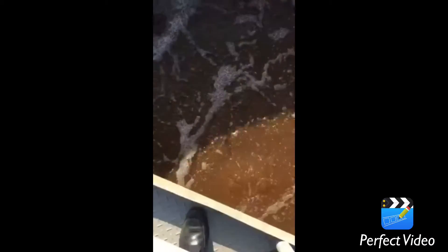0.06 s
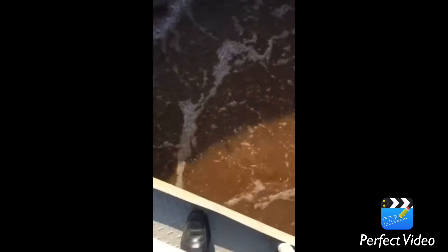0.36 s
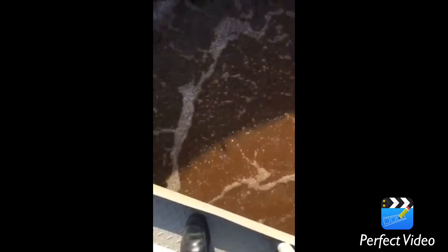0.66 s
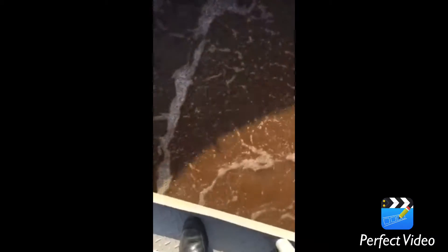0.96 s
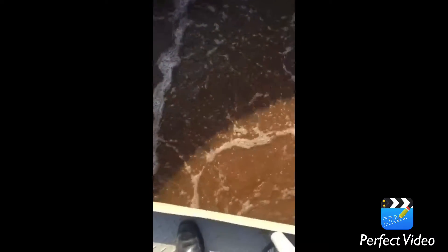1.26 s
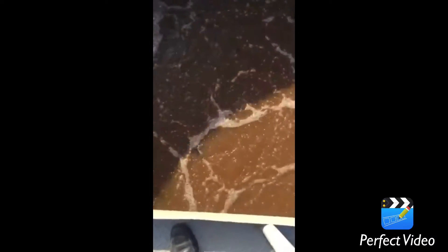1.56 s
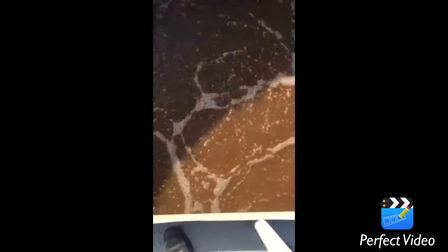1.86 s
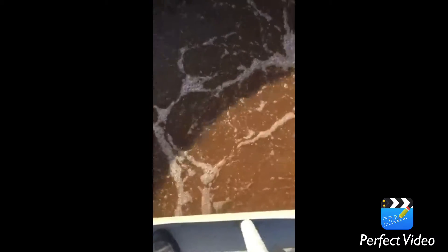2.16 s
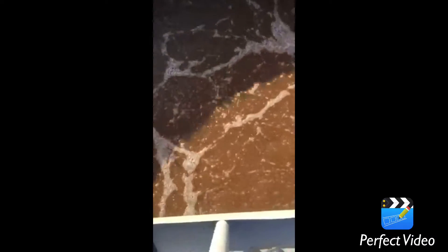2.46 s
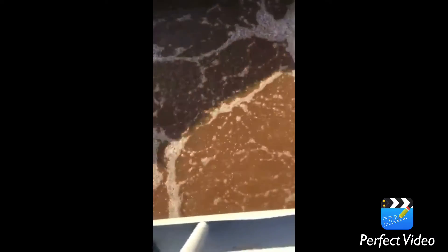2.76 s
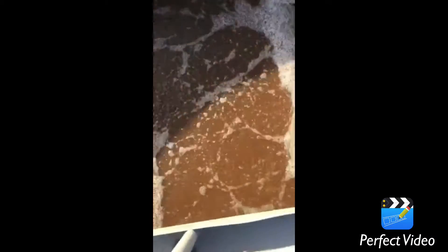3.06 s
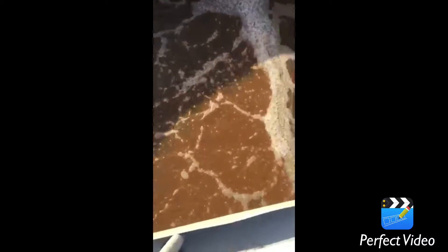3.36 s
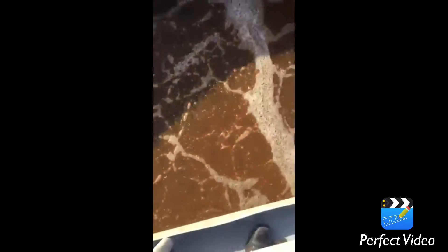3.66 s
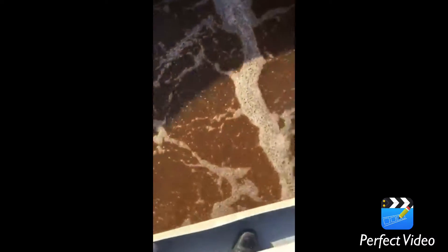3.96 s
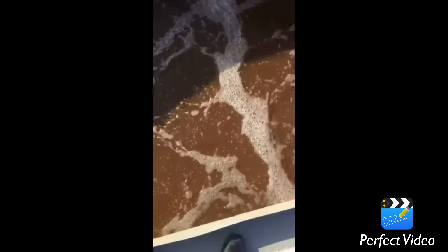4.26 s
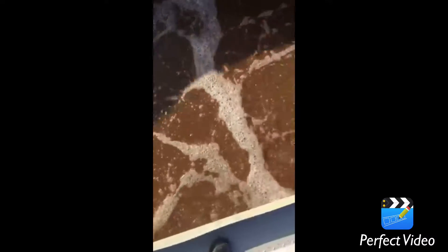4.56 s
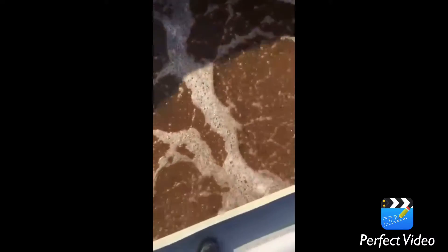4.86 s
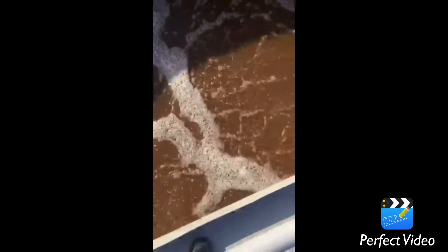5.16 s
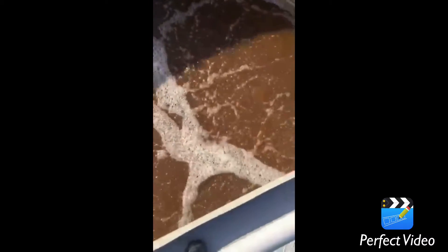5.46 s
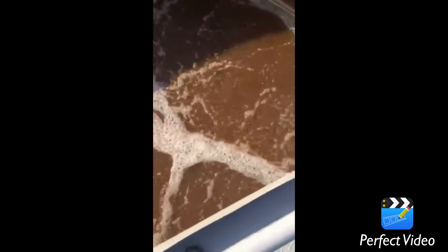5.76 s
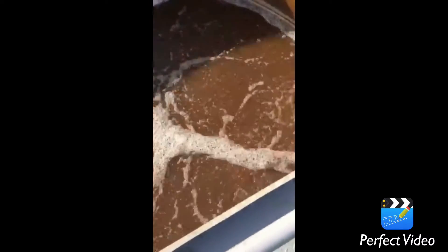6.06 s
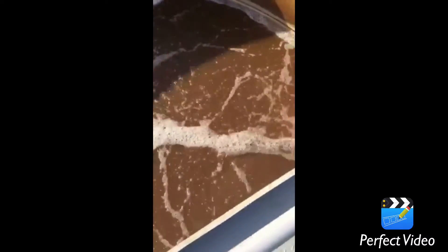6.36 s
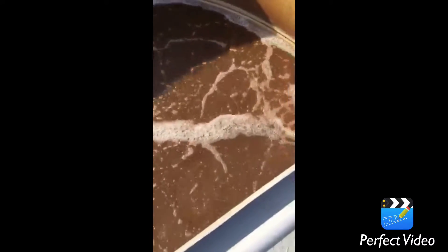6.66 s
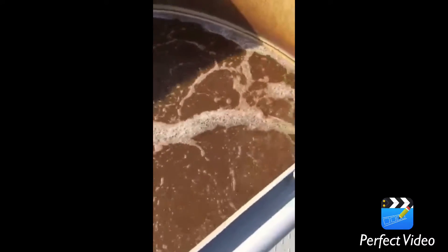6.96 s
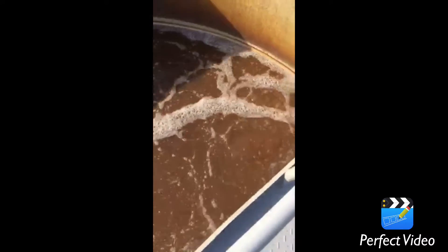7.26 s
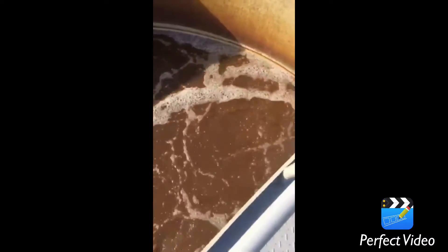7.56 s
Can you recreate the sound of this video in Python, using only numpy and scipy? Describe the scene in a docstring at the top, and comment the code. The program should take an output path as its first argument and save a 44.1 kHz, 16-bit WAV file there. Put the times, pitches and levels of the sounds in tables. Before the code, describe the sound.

Outdoors at an aeration tank, foamy water churns and bubbles continuously over the drone and thin whine of blower machinery. Low wind rumble runs underneath, and after about a second gusts start knocking on the microphone in clusters of hollow thumps. These thin out past the middle, as the machine tones swell and several big bubbles glug up through the water.

```python
"""An aeration tank heard from its walkway: rising air keeps the water gurgling, splashing and fizzing.
Behind it a blower hums and whines, its tones swelling as the listener turns through their standing
waves; its supply pipe roars and a second machine drones. Wind rumbles on the microphone and throws
dull puffs and hollow thumps at it. Late on, a run of large bubbles glugs to the surface."""
import sys
import numpy as np
from scipy import signal
from scipy.fft import rfft, irfft, next_fast_len
from scipy.io import wavfile
from scipy.ndimage import uniform_filter1d, map_coordinates

SR = 44100
rng = np.random.default_rng(int(sys.argv[2]) if len(sys.argv) > 2 else 0)


def digitize_waveform(pressure):
    """Quantize a signal to 16-bit integers and store it at the path in sys.argv[1].

    Rows of a 2-D input are taken as channels; values are limited to [-1, 1].
    """
    field = np.atleast_2d(pressure).T
    bounded = np.clip(field, -1, 1)
    quanta = np.round(bounded * 32767).astype(np.int16)
    wavfile.write(sys.argv[1], SR, quanta)


N = 340011
SHAFT_HZ = 48.702

# faders for the water, before trim: t/s, gurgle/dB, splash/dB, fizz/dB
WATER_LEVELS = [(0.0, -36.5, -42.5, -51), (0.62, -37, -43.5, -52.5), (1.44, -38.5, -44.5, -53.5),
                (1.8, -42, -48, -54), (1.97, -36.5, -45.5, -53.5), (2.38, -34, -43.5, -51.5),
                (2.86, -36.5, -43, -50), (3.05, -33.5, -43.5, -50), (3.39, -36, -43.5, -52),
                (3.78, -37, -44, -52.5), (4.53, -35, -44, -50.5), (4.81, -34, -42, -47),
                (5.28, -33.5, -43, -50), (5.54, -32, -42, -50), (7.28, -36, -41.5, -49),
                (7.71, -33, -40.5, -47)]
# EQ of the deep gurgle: f/Hz, level/dB
GURGLE_EQ = [(25, -27), (70, -3.5), (170, 8), (330, 1), (450, -3), (570, 0.5), (780, -6), (1000, -6),
             (1150, -19.5), (1500, -19.5), (3000, -66.5)]
# EQ of the splash before the listener turns: f/Hz, level/dB
SPLASH_EQ = [(600, -31), (1030, 3.5), (1130, -2), (1350, -3.5), (1580, 3), (1780, -1.5), (1920, -4.5),
             (2250, -5.5), (2500, -6.5), (3300, -11), (5000, -19.5), (10000, -40)]
# EQ of the splash after the turn: f/Hz, level/dB
TURNED_SPLASH_EQ = [(600, -16), (1100, 0), (1350, -1), (1580, 1), (1780, -2), (1920, -3.5), (2250, -7.5),
                    (2500, -6), (3300, -10), (5000, -20), (10000, -38)]
# EQ of the foam's fizz: f/Hz, level/dB
FIZZ_EQ = [(1500, -25), (3800, -2), (4450, 0), (4900, -6.5), (5600, 1), (6150, -0.5), (6550, 1), (6950, -2),
           (7300, -0.5), (7700, -3.5), (8600, -1), (9200, -1.5), (10100, -4.5), (11000, -6.5)]
# the listener's turn: t/s, stance (0 first, 1 second, 2 third)
STANCE = [(0, 0), (1.5, 0), (3, 0.89), (4.3, 1.08), (6.1, 1.31), (6.9, 1.5), (7.4, 1.57)]
# blower hum at each stance, before trim: multiple of the shaft rate, first/dB, second/dB, third/dB
HUM_ORDERS = [(2, -39, -55, -25), (4, -42, -48, -31), (6, -48.5, -61.5, -34), (7, -52, -62, -66),
              (9, -50, -58.5, -26), (10, -57, -54, -36), (11, -48, -55, -49.5), (17, -71, -46, -52),
              (18, -60, -53, -46), (22, -54, -63, -47.5), (23, -72, -63.5, -56), (24, -53.5, -55, -63),
              (26, -67, -52.5, -61.5), (28, -72, -66, -56), (33, -66, -71.5, -39), (36, -58, -59.5, -59)]
# the blower's lead tones in their standing waves: t/s, drone/dB, vanes/dB, lower gear mesh/dB
TONE_LEVELS = [(0, -53, -55, -66), (.4, -50, -57, -74), (1.1, -48, -51.5, -49), (1.8, -48, -49, -52.5),
               (2.3, -55, -53, -56.5), (3.1, -51, -64, -47), (3.7, -43, -62, -54), (4.2, -41, -45.5, -56.5),
               (4.7, -47, -44.5, -48), (5.3, -42.5, -41.5, -48.5), (5.9, -42.5, -42, -56),
               (6.4, -38.5, -40.5, -48.5), (7.1, -37, -42, -46), (7.7, -38.5, -41.5, -49.5)]
# resonances of the blower casing: f/Hz, width/Hz, relative level/dB
CASING_MODES = [(197, 47, 6.5), (647, 34, -6), (2056, 130, -6), (2394, 97, -7.5)]
# gear whines in their standing waves: t/s, lower sidebands/dB, upper mesh/dB, upper sidebands/dB
WHINE_LEVELS = [(0, -51.5, -68, -60), (.6, -52, -68, -60), (1.2, -59, -75, -59), (2.4, -67, -73, -77),
                (3.1, -63, -75, -70), (3.9, -65, -81, -67), (4.7, -55, -57, -52), (5.3, -52, -67, -58.5),
                (6, -49.5, -64, -56), (6.8, -55, -50, -61), (7.7, -55, -59, -63)]
# sidebands of the lower whine: multiple of a third of the shaft rate, relative level/dB
LOWER_SIDEBANDS = [(122, -20.5), (124, -15.5), (125, -5), (127, -10.5), (129, -2.5), (130, -2),
                   (131, -11.5)]
# sidebands of the upper whine: multiple of a third of the shaft rate, relative level/dB
UPPER_SIDEBANDS = [(140, -5.5), (143, -17), (144, -18), (145, 0), (147, -8)]
# fader for the supply pipe's roar: t/s, level/dB
PIPE_LEVELS = [(0, -44), (1, -44.5), (1.6, -55.5), (3, -53), (4.5, -46.5), (5.3, -44), (5.9, -41),
               (6.3, -47), (6.8, -42), (7.3, -49), (7.7, -43)]
# tones of the second machine: f/Hz, relative level/dB, wander/Hz
MOTOR_TONES = [(662, 0, .4), (1305, -14, .5)]
# faders for the second machine: t/s, tone/dB, rush/dB
MOTOR_LEVELS = [(0, -45, -41.5), (.6, -43, -40), (1.1, -42, -37), (1.5, -47, -45.5), (2.2, -43.5, -41),
                (2.75, -42, -51), (2.98, -59, -34), (3.4, -47, -51), (4.2, -51, -45.5), (5.4, -45, -47),
                (6.1, -55, -42), (6.7, -50.5, -44), (7.7, -58, -50)]
# fader for the bed of light wind, before trim: t/s, level/dB
BREEZE_LEVELS = [(0, -31.5), (.5, -32.5), (.9, -28.5), (1.3, -37.5), (1.8, -29), (2.5, -40.5), (3.1, -34.5),
                 (4.25, -30), (4.6, -40.5), (5.3, -36), (5.6, -33), (6.2, -33.5), (6.5, -28.5), (7.05, -29),
                 (7.45, -38.5), (7.7, -35.5)]
# EQ of the wind's rumble: f/Hz, level/dB
BREEZE_EQ = [(15, -26.5), (30, -17), (55, 4), (90, 4.5), (150, 1.5), (220, -2), (350, -26.5), (700, -35.5),
             (2000, -93.5)]
# strong eddies hitting the microphone: t/s, level/dB, half length/s, centre f/Hz
EDDY_CUES = [(0.217, -25, 0.014, 167), (0.262, -25.5, 0.012, 170), (0.41, -29, 0.02, 130),
             (0.798, -26, 0.0084, 120), (1.025, -23.5, 0.018, 110), (1.2, -13, 0.0047, 292),
             (1.215, -15.5, 0.012, 195), (1.357, -20, 0.0075, 260), (1.418, -16.5, 0.0032, 310),
             (1.429, -19.5, 0.012, 180), (1.521, -18, 0.0083, 164), (1.557, -15.5, 0.014, 149),
             (1.604, -18.5, 0.0046, 220), (1.628, -17.5, 0.0089, 225), (1.667, -15, 0.014, 223),
             (1.717, -10, 0.012, 300), (1.742, -15, 0.0074, 305), (1.767, -10, 0.0044, 367),
             (1.795, -19, 0.0099, 270), (1.867, -13.5, 0.007, 424), (1.95, -19.5, 0.005, 292),
             (1.969, -14, 0.0059, 316), (1.994, -16.5, 0.006, 195), (2.029, -26, 0.0058, 250),
             (2.209, -13.5, 0.0089, 267), (2.342, -18, 0.01, 215), (2.362, -16, 0.003, 125),
             (2.413, -13, 0.011, 192), (2.46, -13, 0.0049, 212), (2.484, -10, 0.0069, 200),
             (2.5, -13.5, 0.014, 273), (2.56, -18.5, 0.0084, 185), (2.583, -11.5, 0.0092, 258),
             (2.599, -13.5, 0.004, 260), (2.613, -16, 0.0065, 300), (2.645, -16.5, 0.0093, 235),
             (2.69, -17.5, 0.012, 310), (3.13, -16, 0.0086, 181), (3.174, -13, 0.0099, 165),
             (3.206, -15, 0.008, 166), (3.22, -15.5, 0.0071, 163), (3.245, -14.5, 0.0083, 169),
             (3.264, -17.5, 0.0088, 155), (3.298, -11, 0.0034, 182), (3.406, -18, 0.0093, 170),
             (3.436, -15, 0.013, 215), (3.476, -16.5, 0.0082, 160), (3.555, -23, 0.014, 240),
             (3.589, -18, 0.0055, 283), (3.63, -19.5, 0.0074, 228), (3.762, -17, 0.014, 244),
             (3.789, -23, 0.016, 175), (3.852, -20, 0.015, 170), (3.886, -15, 0.0066, 233),
             (3.903, -19.5, 0.013, 166), (3.989, -15.5, 0.003, 170), (4.023, -16.5, 0.008, 214),
             (4.128, -21, 0.0054, 179), (4.19, -23.5, 0.007, 179), (4.233, -23.5, 0.012, 164),
             (4.271, -16.5, 0.018, 156), (4.305, -16, 0.0096, 155), (4.364, -18, 0.014, 173),
             (4.431, -20, 0.0076, 203), (4.606, -27, 0.0071, 170), (4.951, -26, 0.013, 223),
             (5.033, -21.5, 0.0085, 215), (5.623, -20.5, 0.005, 327), (5.75, -16, 0.006, 280),
             (5.888, -28, 0.008, 130), (5.978, -19.5, 0.015, 173), (6.133, -27, 0.0068, 160),
             (6.324, -24.5, 0.027, 157), (6.444, -22, 0.014, 186), (6.484, -20, 0.015, 230),
             (6.68, -20.5, 0.013, 190), (6.758, -15.5, 0.0034, 161), (6.799, -19.5, 0.0075, 188),
             (6.827, -15.5, 0.004, 144), (6.992, -19, 0.003, 244), (7.245, -15, 0.0071, 177)]
# EQ of one eddy: multiple of its centre frequency, level/dB
EDDY_EQ = [(.1, -14), (.3, -2.5), (.65, 0), (1.05, 1), (1.5, -6), (2.3, -16), (3.6, -23), (7, -43),
           (25, -100)]
# washes of breaking water: t/s, level/dB, half length/s, centre f/Hz
WASH_CUES = [(.74, -46, 0.058, 2450), (1.8, -49, 0.015, 2700), (3.88, -52, 0.069, 2500),
             (5.77, -43, 0.07, 2320), (5.72, -46.5, 0.34, 955)]
# wind striking the microphone port head-on: t/s, level/dB, f/Hz
THUMP_CUES = [(1.199, -11, 480), (1.359, -5, 400), (1.418, -24, 420), (1.519, -21.7, 330),
              (1.601, -19, 480), (1.658, -11, 410), (1.717, -5, 440), (1.743, -10, 390), (1.77, -6, 410),
              (1.869, -5.5, 550), (1.968, -11.7, 480), (2.206, -16, 444), (2.419, -18, 330),
              (2.476, -17.1, 380), (2.497, -6, 355), (2.586, -12, 410), (2.598, -9.9, 350),
              (2.611, -12, 380), (2.644, -20, 360), (2.7, -11, 358), (3.135, -19.9, 500), (3.3, -15.5, 425),
              (3.437, -14.4, 470), (3.587, -13, 340), (3.765, -16.2, 403), (3.885, -12.5, 347),
              (4.018, -21, 380), (4.305, -18.5, 354), (5.617, -17.2, 440), (5.752, -15.5, 480),
              (5.967, -22.4, 362), (6.756, -27, 420), (7.246, -21.5, 380)]
# a thin hiss in the fizz: t/s, level/dB, centre f/Hz
HISS_PATH = [(0, -74, 7100), (2.8, -75, 7100), (3.05, -55, 7130), (3.5, -82, 7300), (5.3, -85, 7400),
             (5.6, -64, 7400), (6.1, -64, 7400), (6.7, -72, 7450), (7.3, -66, 7650), (7.65, -55, 7800)]
# large bubbles surfacing: t/s, level/dB, starting f/Hz
GLUG_CUES = [(5.31, -33, 618), (5.43, -30, 593), (5.455, -27, 652), (5.48, -35, 697), (5.565, -38, 880),
             (5.58, -36, 693), (5.705, -35, 1007), (5.825, -32.5, 940), (5.9, -37, 880), (6.003, -34, 688),
             (6.115, -37, 970), (6.245, -35, 734), (6.273, -31, 614)]


def amp(db):
    """Decibels to gain."""
    return 10 ** (np.asarray(db) / 20)


def unit(x):
    """Scale to rms 1."""
    return x / np.sqrt(np.mean(x ** 2) + 1e-20)


def eq_gain(eq, hz):
    """Gain of an EQ curve at hz, its points joined on a log frequency axis."""
    f, db = np.transpose(eq)
    return amp(np.interp(np.log(hz + 1e-6), np.log(f), db))


def curves(rows):
    """Automation lanes: one value per sample for each column after the time."""
    times, *columns = np.transpose(rows)
    return [np.interp(np.arange(N) / SR, times, column) for column in columns]


def wobble(rate):
    """A smooth random curve, rate knots a second."""
    knots = rng.standard_normal(int(N * rate / SR) + 4)
    return map_coordinates(knots, [np.arange(N) * rate / SR])


def filtered(x, response):
    """Pass x through a frequency response."""
    size = next_fast_len(len(x) + len(x) // 8)
    return irfft(rfft(x, size) * response(np.fft.rfftfreq(size, 1 / SR)), size)[:len(x)]


def coloured(x, eq):
    """Pass x through an EQ curve and scale to rms 1."""
    return unit(filtered(x, lambda hz: eq_gain(eq, hz)))


def patchy(depth_db):
    """White noise with drifting patches of random gain."""
    spectrum = signal.stft(rng.standard_normal(N), nperseg=512)[2]
    patches = uniform_filter1d(rng.standard_normal(spectrum.shape), size=5, axis=0)
    patches = uniform_filter1d(patches, size=16, axis=1)
    return unit(signal.istft(spectrum * amp(depth_db * unit(patches)), nperseg=512)[1][:N])


def bubbles(low_hz, high_hz, cycles, spread_db, count):
    """Damped bubble rings of random size, each rising in pitch as it nears the surface."""
    when, pitch, strength = rng.random((count, 3)).T
    hz = (low_hz * (high_hz / low_hz) ** pitch)[:, None]
    t = np.arange(int(min(SR * cycles / low_hz, 1200))) / SR
    age = t * hz / cycles  # 1 when the ring is 60 dB down
    envelope = amp(-60 * age) * (1 - np.exp(-20 * age))
    ring = envelope * np.sin(2 * np.pi * hz * t * (1 + age / 10))
    gain = hz * amp(-spread_db * np.log(1 - .99 * strength))[:, None]
    at = (when * N).astype(int)[:, None] + np.arange(len(t))
    return unit(np.bincount(at.ravel(), (gain * ring).ravel(), N)[:N])


def water():
    """Big bubbles gurgle up, the churned surface splashes, and tiny bubbles burst in the foam."""
    gurgle_db, splash_db, fizz_db = curves(WATER_LEVELS)
    gurgle = patchy(2.5) + amp(-14) * bubbles(377.5, 1204, cycles=13.5, spread_db=2, count=1200)
    splash = patchy(1.76) + amp(-13) * bubbles(1175, 4130, cycles=13.7, spread_db=2.5, count=5000)
    fizz = patchy(1.5) + amp(-9.5) * bubbles(3040, 10000, cycles=5.5, spread_db=2, count=20000)
    turned = np.clip(curves(STANCE)[0], 0, 1)
    splash = (1 - turned) * coloured(splash, SPLASH_EQ) + turned * coloured(splash, TURNED_SPLASH_EQ)
    return (amp(gurgle_db + 0.1) * coloured(gurgle, GURGLE_EQ)
            + amp(splash_db) * splash
            + amp(fizz_db + 0.73) * coloured(fizz, FIZZ_EQ))


def tone(hz, clock, flutter_db):
    """A machine tone of rms 1 whose level flutters, slowly and quickly, in the moving air."""
    sine = np.sin(2 * np.pi * (hz * clock + rng.random()))
    return unit(sine * amp(flutter_db * (wobble(4) + 0.82 * wobble(22))))


def blower():
    """Shaft orders and gear whine share one slightly unsteady speed; rushing air rings the casing."""
    clock = np.cumsum(1 + 0.000562 * wobble(2.96)) / SR
    stance, = curves(STANCE)
    drone_db, vane_db, mesh_db = curves(TONE_LEVELS)
    hum = np.zeros(N)
    for order, *stance_db in HUM_ORDERS:
        gain = amp(np.interp(stance, [0, 1, 2], stance_db))
        hum += gain * tone(order * SHAFT_HZ, clock, flutter_db=2)
    drone = amp(drone_db) * tone(13 * SHAFT_HZ, clock, flutter_db=0.8)
    vanes = amp(vane_db) * tone(25 * SHAFT_HZ, clock, flutter_db=1)
    return amp(-0.5) * hum + drone + vanes + casing() + gears(clock, mesh_db)


def casing():
    """A steady rush of air, coloured by the resonances of the blower casing."""
    def response(f):
        modes = sum((-1) ** k * amp(db) * 1j * f * width / (hz ** 2 - f ** 2 + 1j * f * width)
                    for k, (hz, width, db) in enumerate(CASING_MODES))
        return modes * np.abs(modes) ** 0.26  # sharpens the peaks

    return amp(-44.5) * unit(filtered(rng.standard_normal(N), response))


def gears(clock, lower_db, flutter_db=1.4, drift_rad=0.56):
    """Each gear pair sings a mesh tone; sidebands out of step with it give a light, uneven flutter."""
    phase = 2 * np.pi * clock * SHAFT_HZ / 3
    lower_sides_db, upper_db, upper_sides_db = curves(WHINE_LEVELS)

    def whine(mesh_order, mesh_db, sidebands, sides_db):
        out = amp(mesh_db + flutter_db * wobble(14)) * np.sin(mesh_order * phase)
        for order, db in sidebands:
            offset = np.pi / 2 * (order - mesh_order) ** 2 + drift_rad * wobble(3)
            out += amp(sides_db + db) * np.sin(order * phase + offset)
        return np.sqrt(2) * out

    return (whine(128, lower_db, LOWER_SIDEBANDS, lower_sides_db)
            + whine(146, upper_db, UPPER_SIDEBANDS, upper_sides_db))


def pipe(centre_hz=898, width_hz=82):
    """Air rushing through the supply pipe roars in one hollow resonance."""
    level_db, = curves(PIPE_LEVELS)
    resonance = lambda hz: 1 / (1 + ((hz - centre_hz) / width_hz) ** 2) ** 2
    return amp(level_db) * unit(filtered(rng.standard_normal(N), resonance))


def motor():
    """A second machine holds a firm tone of its own, with a narrow rush of air around it."""
    tone_db, rush_db = curves(MOTOR_LEVELS)
    tones = np.zeros(N)
    for hz, db, wander_hz in MOTOR_TONES:
        clock = np.cumsum(1 + wander_hz / hz * wobble(14)) / SR
        tones += amp(db) * tone(hz, clock, flutter_db=1)
    rush_eq = [(540, -62), (610, -21.5), (645, -4), (675, -9.5), (705, -11), (800, -59)]
    return amp(tone_db) * tones + amp(rush_db) * coloured(rng.standard_normal(N), rush_eq)


def breeze(trim_db=-2.5, flutter_db=4):
    """Countless weak eddies make a bed of low rumble that flutters at random."""
    level_db, = curves(BREEZE_LEVELS)
    gain = amp(level_db + trim_db + flutter_db * wobble(25))
    return gain * coloured(rng.standard_normal(N), BREEZE_EQ)


def puffs(low_hz=34.2, high_hz=980):
    """Each eddy is a dull puff with its own pitch and length; the microphone port sheds sub and top."""
    t = np.arange(-SR // 8, SR // 8) / SR
    port = lambda f: (1j * f / (1j * f + low_hz)) ** 2 / np.sqrt(1 + (f / high_hz) ** 6)
    out = np.zeros(N + SR)
    for at, db, half, hz in EDDY_CUES:
        width = np.where(t < 0, half, 1.226 * half)  # release a little longer than attack
        swell = np.exp(-np.abs(t / width) ** 1.78 / 2)
        turbulence = swell * rng.standard_normal(len(t))
        puff = unit(filtered(turbulence, lambda f: eq_gain(EDDY_EQ, f / hz) * port(f)))
        out[round(at * SR):][:len(t)] += amp(db) * puff * np.sqrt(np.mean(swell ** 2))
    return out[len(t) // 2:][:N]  # each swell peaks on its cue


def washes():
    """Now and then a welling of air breaks the surface in a soft swell."""
    t = np.arange(N) / SR
    out = np.zeros(N)
    for at, db, half, hz in WASH_CUES:
        near = np.abs(t - at) < .6
        eq = [(.5 * hz, -35), (.6 * hz, -7), (hz, 0), (1.12 * hz, -7), (2 * hz, -30), (4 * hz, -80)]
        swell = np.exp(-((t[near] - at) / half) ** 2 / 2)
        out[near] += amp(db) * swell * coloured(rng.standard_normal(near.sum()), eq)
    return out


def thumps(half_cycles=0.63):
    """An eddy that strikes the microphone port head-on gives a hollow thump."""
    t = np.arange(-SR // 8, SR // 8) / SR
    out = np.zeros(N + SR)
    for at, db, hz in THUMP_CUES:
        envelope = np.exp(-(t * hz / half_cycles) ** 2 / 2)
        out[round(at * SR):][:len(t)] += amp(db) * envelope * np.cos(2 * np.pi * (hz * t + rng.random()))
    return out[len(t) // 2:][:N]


def hiss():
    """A narrow band of hiss swells now and then and drifts upward."""
    level_db, centre_hz = curves(HISS_PATH)
    low_noise = coloured(rng.standard_normal(N), [(120, -3), (250, -11), (600, -34.5), (2000, -77)])
    carrier = np.sin(2 * np.pi * np.cumsum(centre_hz) / SR)
    return amp(level_db) * unit(low_noise * carrier)


def glugs(attack_s=0.0049, t60_s=0.098, rise_per_s=0.93):
    """A large bubble rings briefly as it surfaces, rising in pitch."""
    t = np.arange(SR // 5) / SR
    envelope = (1 - np.exp(-t / attack_s)) * amp(-60 * t / t60_s)
    envelope *= np.sqrt(2) / envelope.max()
    out = np.zeros(N + SR)
    for at, db, hz in GLUG_CUES:
        ring = np.sin(2 * np.pi * hz * t * (1 + rise_per_s * t / 2))
        out[round(at * SR):][:len(t)] += amp(db) * envelope * ring
    return out[:N]


def scene():
    """The mono mix: beds of water, machinery and wind, with spot sounds on top."""
    beds = water() + blower() + pipe() + motor() + breeze()
    spots = puffs() + washes() + thumps() + hiss() + glugs()
    return (beds + spots)[None]


def record(dry, ceiling=0.85, top_hz=10320):
    """The recorder rounds off the strongest buffets and keeps nothing above its band limit."""
    rounded = dry / (1 + np.abs(dry / ceiling) ** 6) ** (1 / 6)
    brick_wall = lambda hz: 1 / np.sqrt(1 + (hz / top_hz) ** 200)
    return np.array([filtered(channel, brick_wall) for channel in rounded])


dry = scene()
out = record(dry)
digitize_waveform(out)
```